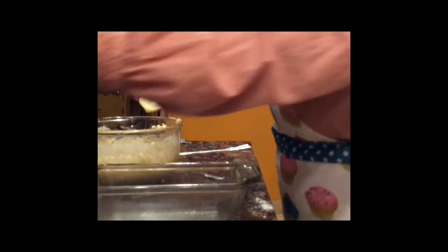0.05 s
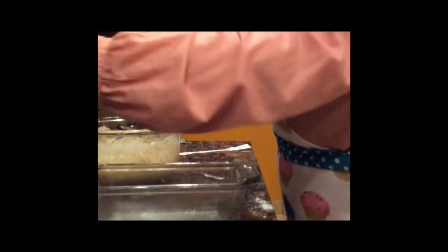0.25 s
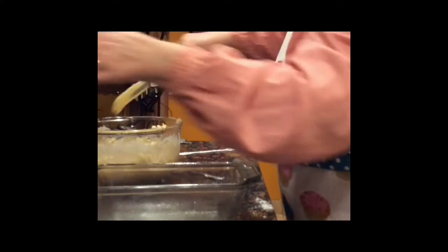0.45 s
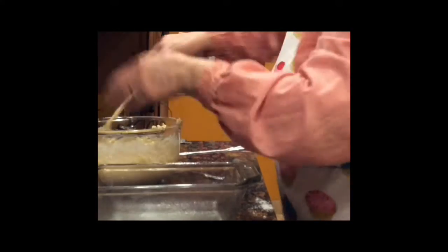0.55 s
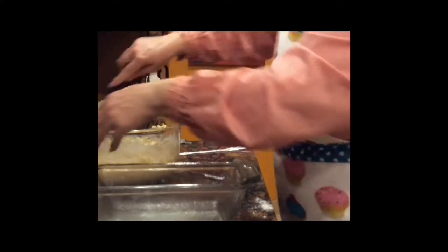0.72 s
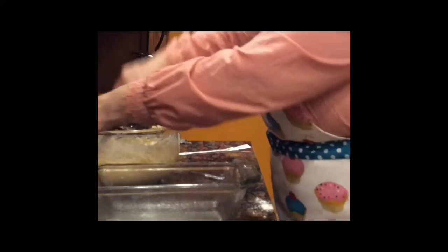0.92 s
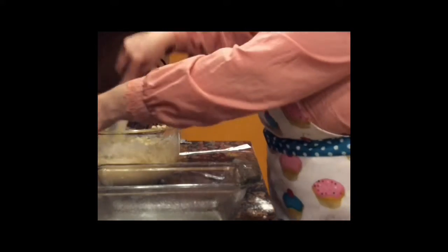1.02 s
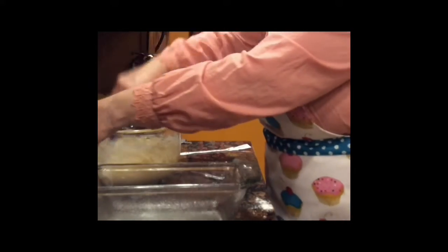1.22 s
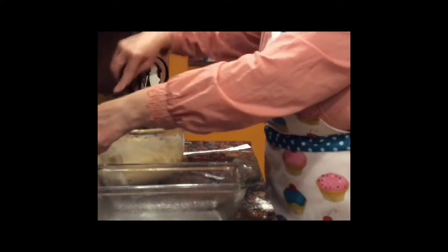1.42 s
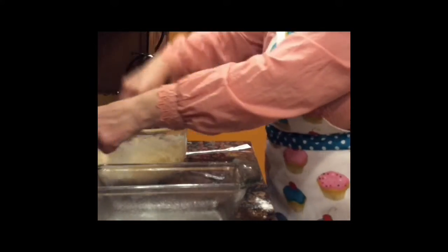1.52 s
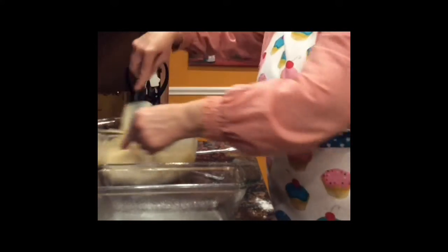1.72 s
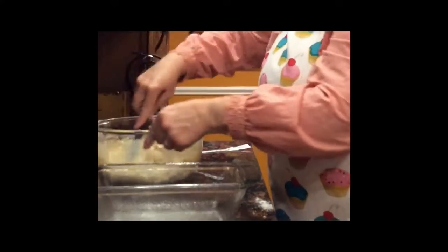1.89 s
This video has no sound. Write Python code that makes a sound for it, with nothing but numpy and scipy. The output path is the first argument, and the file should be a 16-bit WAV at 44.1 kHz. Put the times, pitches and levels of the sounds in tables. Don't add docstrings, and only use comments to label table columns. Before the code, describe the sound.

A spatula knocks hard on a glass bowl of batter at about 0.2 and 0.35 seconds, each a quick woody, ringing clatter with a bright crack and short rattle. Soft taps follow near 0.9 to 1.0, sleeves rustle and the blade scuffs faintly. Blade taps land around 1.62, thin wires jingle from 1.75, and a firmer bowl tap comes at 1.9. Low fridge hum, close microphone, short room reflections.

```python
import sys
import numpy as np
from scipy import signal
from scipy.fft import rfft, irfft, next_fast_len
from scipy.io import wavfile
from scipy.ndimage import map_coordinates

SR = 44100
rng = np.random.default_rng(int(sys.argv[2]) if len(sys.argv) > 2 else 0)


def undo_db(level):
    steps = np.asarray(level, float) / 20
    return 10 ** steps


def waveform_to_disk(signal):
    frames = np.transpose(np.atleast_2d(signal))
    scaled = np.clip(frames, -1, 1) * 32767
    samples = np.round(scaled).astype(np.int16)
    wavfile.write(sys.argv[1], SR, samples)


N = 85995

# frequency in Hz, level in dB per Hz.
AIR_COLOUR = [(15, -57), (25, -37.5), (43, -14.5), (117, -10.5), (153, -12), (754, -19.5), (1130, -24.5),
              (1940, -33.5), (16000, -43)]
# frequency in Hz, level in dB, width in Hz.
FRIDGE_HUM = [(58.7, -61.5, 0.24), (116.7, -62, 14), (172.7, -71, 30), (299.2, -72, 33)]
# frequency in Hz, t60 in seconds.
WALL_DECAY = [(200, 0.28), (1000, 0.36), (4000, 0.37), (12000, 0.086)]

# frequency in Hz, level in dB per Hz.
CLOTH_COLOUR = [(400, -30.5), (900, -9), (2500, -4.5), (6000, -5.5), (12500, -5.5), (16000, -8.5)]
# start, rise and hold in seconds, fall t60 in seconds, level in dB.
SLEEVE_STROKES = [(0, 0.0061, 0.39, 1, -69.5), (.80, 0.19, 0.06, 0.77, -61), (.975, .004, .03, .3, -64.5),
                  (1.043, 0.002, 0.01, 0.33, -59.5), (1.075, 0.003, 0.0093, 0.22, -65),
                  (1.125, 0.0035, 0.0085, 0.17, -67.5), (1.272, 0.0094, 0.045, .6, -65.5),
                  (1.32, 0.018, 0.064, 0.68, -63), (1.425, 0.0064, 0.012, .3, -72.5),
                  (1.617, 0.0022, 0.067, 0.43, -58.5), (1.728, 0.0046, 0.05, .8, -60),
                  (1.874, 0.0026, 0.012, 0.4, -55.5), (1.90, .004, .05, .5, -62)]
# frequency in Hz, level in dB, width in Hz.
SCUFF_BANDS = [(1897, 2, 220), (2740, -1.5, 107), (5360, -4, 300)]
# start, rise and hold in seconds, fall t60 in seconds, level in dB.
SCUFF_STROKES = [
    (.085, 0.018, 0.29, 0.35, -76.5),
    (1.26, 0.011, 0.06, 0.28, -76.5),
    (1.50, 0.014, 0.17, 0.5, -75),
]
# frequency in Hz, level in dB, width in Hz.
WHINE_BAND = [(4430, 0, 40)]
# start, rise and hold in seconds, fall t60 in seconds, level in dB.
WHINE_STROKES = [
    (1.835, .006, .045, .15, -64.5),
]

# frequency in Hz, level in dB, t60 in seconds.
COUNTER_MODES = [(101, -5, 0.12), (168, 1, .12), (392, -7, 0.079)]
# time in seconds, level in dB, contact in ms.
COUNTER_THUDS = [
    (0, -55, 0.26),
    (.3430, -36, .5),
    (1.632, -47.5, 0.56),
]
# frequency in Hz, level in dB, t60 in seconds.
SIDE_MODES = [(650, -4.5, 0.046), (1046, -1.5, 0.11), (1850, -2.5, 0.037), (3004, -1, 0.059),
              (4170, 3, 0.031)]
# time in seconds, level in dB, contact in ms.
SIDE_CONTACTS = [
    (.8665, -47.5, 0.65),
    (1.9025, -51.5, 0.024),
    (1.9050, -50.5, 0.077),
    (1.9095, -38.5, 0.47),
]
# frequency in Hz, level in dB, t60 in seconds.
RIM_MODES = [(488, 10, 0.082), (1068, -3.5, 0.3), (1580, -9, 0.043), (1890, -4.5, 0.18), (3000, 1, 0.07),
             (4070, 0, 0.06), (5560, -6, 0.055)]
# time in seconds, level in dB, contact in ms.
RIM_CONTACTS = [
    (.977, -56.5, 0.075),
    (.980, -67, 0.056),
]
# frequency in Hz, level in dB, t60 in seconds.
BLADE_MODES = [(950, -29.5, 0.077), (1180, -8.5, 0.093), (1486, -9.5, 0.069), (1834, 0, 0.037),
               (3130, -17, 0.033)]
# time in seconds, level in dB, contact in ms.
BLADE_CONTACTS = [
    (1.617, -48.5, 0.1),
    (1.620, -38, 0.13),
    (1.630, -38.5, 0.31),
]
# frequency in Hz, level in dB, t60 in seconds.
WIRE_MODES = [(4410, -11, 0.09), (5700, -2.5, 0.11), (7617, -3.5, 0.2), (9170, -1.5, 0.29),
              (10160, -5.5, 0.44), (11360, 5, 0.3), (12070, -6, .15), (9520, -8, 0.14), (13290, 6.5, 0.15),
              (13790, -9, 0.28), (14400, -12.5, 0.25), (15720, -13.5, 0.28)]
# time in seconds, level in dB, contact in ms.
WIRE_CONTACTS = [(1.745, -62, 0.047), (1.785, -63.5, 0.024), (1.830, -63.5, 0.028), (1.876, -59, 0.015),
                 (1.882, -56, 0.013), (1.897, -75, 0.018), (1.919, -56, 0.0274), (1.935, -62, 0.018)]

# start, rise and hold in seconds, fall t60 in seconds, level in dB.
CRACK_STROKES = [
    (.2075, 0.0018, 0.0034, .05, -50.5),
    (.3432, .001, 0.0034, .06, -52),
    (.867, .001, 0.0016, 0.026, -71.5),
]
# frequency in Hz, level in dB.
CLATTER_COLOUR = [(60, -44.5), (200, -11.5), (400, -1), (800, 0.5), (2500, -6.5), (5000, -21),
                  (15000, -43.5)]
# time in seconds, level in dB, contact in ms.
FIRST_KNOCK = [(.2075, -33.5, 0.037), (.2095, -24, 0.19), (.2125, -24, 0.19), (.2150, -21, 0.14),
               (.2172, -18, 0.39), (.2200, -27.5, 0.57), (.2390, -23.5, 0.5), (.2435, -41, 0.34),
               (.2485, -31.5, .5)]
# frequency in Hz, level in dB, t60 in seconds.
FIRST_BODY = [(187, -14.5, 0.2), (386.4, -10, 0.07), (520.4, -8.5, 0.13), (705, -10, 0.031),
              (656, -3, 0.15), (735, -2.5, 0.05), (760, -6, 0.083), (853, -8, 0.0623), (952, -8.5, 0.044),
              (1033, -4, 0.11), (1415, -25, 0.12), (1577, 0.5, 0.062), (1842, -7.5, 0.087),
              (2850, 4.5, 0.019)]
# time in seconds, level in dB, contact in ms.
SECOND_KNOCK = [(.3433, -18.5, 0.67), (.3455, -23, 0.088), (.3480, -21, 0.11), (.3520, -24.5, .3),
                (.3570, -24, 0.48), (.3655, -32, 0.46)]
# frequency in Hz, level in dB, t60 in seconds.
SECOND_BODY = [(283, -23, 0.24), (430, -21, 0.11), (547.6, -3, 0.11), (650, -8.5, 0.13),
               (779.7, -2.5, 0.13), (973, -14.5, 0.0826), (1217, -23.5, 0.22), (1520, -24, 0.19),
               (1587.7, 3.5, 0.094), (1603, -13.5, 0.065), (1860, -2, 0.033), (2418, 0.5, 0.032),
               (2950, -15.5, 0.033), (3210, -18.5, 0.13)]
# frequency in Hz, level in dB, t60 in seconds.
GLASS_MODES = [(1923, -3, 0.36), (1930, 1, 0.3), (3463.5, -6.5, 0.23), (3467.8, -3, 0.33), (5220, 2, 0.031),
               (5560, -20, 0.27), (5370, -22, 0.33)]
# time in seconds, level in dB, contact in ms.
GLASS_CONTACTS = [
    (.2085, -32, 0.067),
    (.3445, -30.5, 0.0508),
]
# frequency in Hz, level in dB, t60 in seconds.
FIRST_RATTLE = [(4560, -19, 0.076), (5810, -11, 0.07), (6977, -20, 0.13), (7700, -12.5, .09),
                (8090, -8, 0.11), (8899, -16, 0.11), (9500, -3, 0.098), (10510, -13, 0.08),
                (11640, -12, 0.11), (12150, -19.5, .1), (13710, -21, 0.11), (14570, -22, 0.077),
                (15150, -25.5, .1)]
# time in seconds, level in dB, contact in ms.
FIRST_SHAKES = [(.2090, -44, .03), (.2170, -41.5, .03), (.2260, -48, .03), (.2380, -53.5, .03),
                (.2550, -53, 0.04), (.2620, -54, .04)]
# frequency in Hz, level in dB, t60 in seconds.
SECOND_RATTLE = [(4650, -12.5, 0.063), (6020, -9.5, 0.1), (7080, -17, 0.068), (7666, -9, 0.084),
                 (8060, -7, 0.21), (9000, -13.5, .08), (9400, -22.5, 0.1), (10700, -16, 0.071),
                 (11700, -12, .07), (13400, -10, .05), (15100, -16, 0.051)]
# time in seconds, level in dB, contact in ms.
SECOND_SHAKES = [
    (.3441, -45.5, .03),
    (.3490, -49, .03),
    (.3660, -58, .04),
]


def unit(x):
    return x / np.sqrt(np.mean(x ** 2) + 1e-20)


def along(points, hz):
    f, v = np.transpose(points)
    return np.interp(np.log(hz + 1), np.log(f + 1), v)


def filtered(x, response):
    m = next_fast_len(len(x) + 8192)
    gain = response(np.fft.rfftfreq(m, 1 / SR))
    return irfft(rfft(x, m) * gain, m)[:len(x)]


def coloured(x, spectrum):
    return unit(filtered(x, lambda hz: undo_db(along(spectrum, hz))))


def noise(spectrum, size):
    return coloured(rng.standard_normal(size), spectrum)


def narrow(bands):
    out = np.zeros(N)
    for centre, db, width in bands:
        band = filtered(rng.standard_normal(N), lambda hz: 1 / (1 + (2 * (hz - centre) / width) ** 2))
        out += undo_db(db) * unit(band)
    return out


def wobble(rate):
    knots = rng.standard_normal(int(N * rate / SR) + 4)
    return map_coordinates(knots, [np.arange(N) * rate / SR])


def strokes(rows):
    start, rise, hold, fall, db = np.transpose(rows)[:, :, None]
    t = np.arange(N) / SR - start
    falling = np.clip(t - rise - hold, 0, None)
    gain = np.clip(t / rise, 0, 1) * undo_db(db - 60 * falling / fall)
    return np.sqrt(np.sum(gain ** 2, 0))


def strike(contacts, modes, scatter_db, clatter_db, rough_db=1.0):
    rise_s, clatter_t60 = 0.00039, 0.059
    out, t = np.zeros(N + SR), np.arange(SR // 2) / SR
    hz, level, t60 = np.transpose(modes)[:, :, None]
    for start, db, contact_ms in contacts:
        vary = scatter_db * rng.standard_normal(hz.shape)
        knots = rng.standard_normal((len(hz), 62))
        flutter = rough_db * np.array([np.interp(t * 120, np.arange(62), row) for row in knots])
        partials = undo_db(level + vary + flutter - 60 * t / t60) * np.sin(2 * np.pi * hz * t)
        ring = np.sum(partials, 0) * (1 - np.exp(-t / rise_s))
        ring = ring + undo_db(clatter_db - 60 * t / clatter_t60) * noise(CLATTER_COLOUR, len(t))
        pole = np.exp(-2 * 1000 / (max(contact_ms, .01) * SR))
        blow = signal.lfilter([1 - pole], [1, -pole], ring)
        out[round(start * SR):][:len(t)] += undo_db(db) * blow
    return out[:N]


def kitchen():
    air = undo_db(-61) * noise(AIR_COLOUR, N) * undo_db(2.56 * wobble(4.18))
    return air + narrow(FRIDGE_HUM)


def walls(x):
    hz, t, z = signal.stft(rng.standard_normal(SR // 2), SR, nperseg=256)
    decay = undo_db(-60 * t / along(WALL_DECAY, hz)[:, None])
    tail = signal.istft(z * decay, SR, nperseg=256)[1]
    late = np.pad(x, (200, 0))
    return signal.fftconvolve(late, tail / np.linalg.norm(tail))[:N]


def sleeves():
    snaps = (rng.random(N) < .006) * undo_db(5.4 * rng.exponential(size=N)) * rng.standard_normal(N)
    hiss = noise(CLOTH_COLOUR, N) * undo_db(1.5 * wobble(45))
    return strokes(SLEEVE_STROKES) * (hiss + undo_db(-12) * coloured(snaps, CLOTH_COLOUR))


def scrapes():
    scuff = strokes(SCUFF_STROKES) * narrow(SCUFF_BANDS)
    return scuff + strokes(WHINE_STROKES) * narrow(WHINE_BAND)


def jingles():
    return strike(WIRE_CONTACTS, WIRE_MODES, 2.5, -6, rough_db=5)


def taps():
    thuds = strike(COUNTER_THUDS, COUNTER_MODES, 2.5, -28)
    side = strike(SIDE_CONTACTS, SIDE_MODES, 2.2, -8)
    rim = strike(RIM_CONTACTS, RIM_MODES, 3.6, -7, rough_db=2.5)
    blade = strike(BLADE_CONTACTS, BLADE_MODES, 1.9, -10, rough_db=7.0)
    return thuds + side + rim + blade


def cracks():
    return strokes(CRACK_STROKES) * noise(CLOTH_COLOUR, N)


def rattle():
    first = strike(FIRST_SHAKES, FIRST_RATTLE, 2.4, 9.5, rough_db=7.0)
    return first + strike(SECOND_SHAKES, SECOND_RATTLE, 2.3, -3, rough_db=6.0)


def knocks():
    first = strike(FIRST_KNOCK, FIRST_BODY, 4.0, 2, rough_db=3.0)
    second = strike(SECOND_KNOCK, SECOND_BODY, 0.57, 2)
    glass = strike(GLASS_CONTACTS, GLASS_MODES, 0.46, -31.0)
    return first + second + glass


def scene():
    hits = jingles() + taps() + cracks() + rattle() + knocks()
    background = kitchen() + sleeves() + scrapes()
    return (background + hits + undo_db(-10.5) * walls(hits))[None]


def band_limit(x):
    return signal.sosfilt(signal.butter(12, 16190, fs=SR, output="sos"), x)


def record(dry):
    low_cut_hz, top_hz = 59, 15900
    low_cut = signal.butter(4, low_cut_hz, "high", fs=SR, output="sos")
    mix = filtered(signal.sosfilt(low_cut, dry[0]), lambda hz: hz < top_hz)
    return band_limit(mix[None])


dry = scene()
out = record(dry)
waveform_to_disk(out)
```